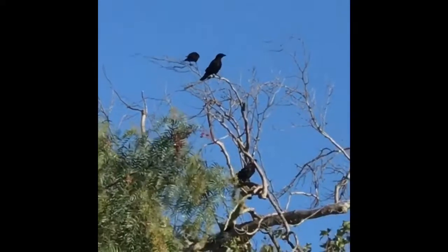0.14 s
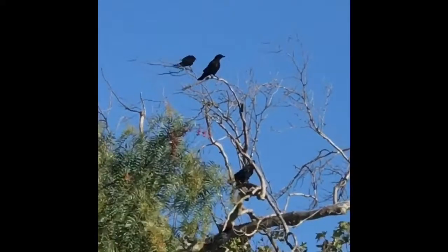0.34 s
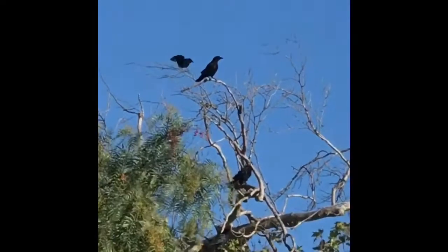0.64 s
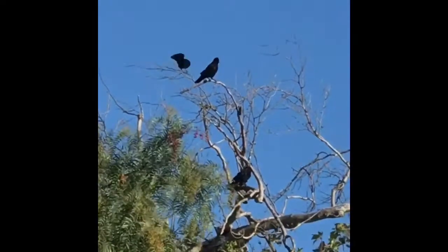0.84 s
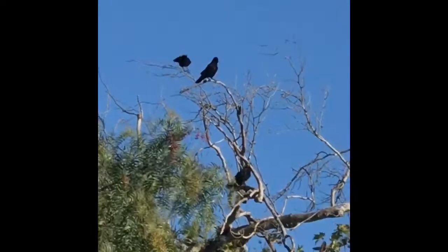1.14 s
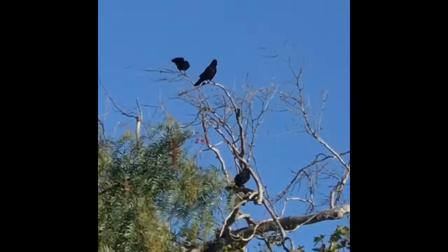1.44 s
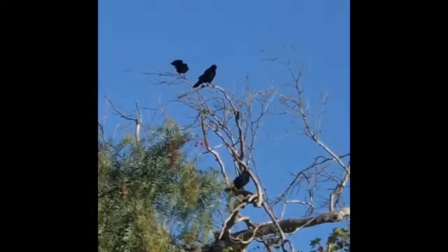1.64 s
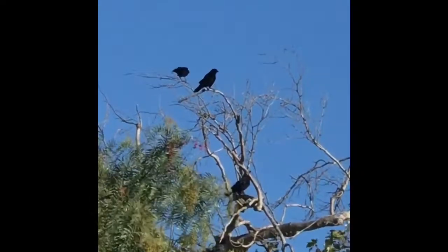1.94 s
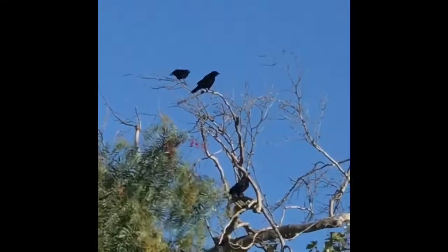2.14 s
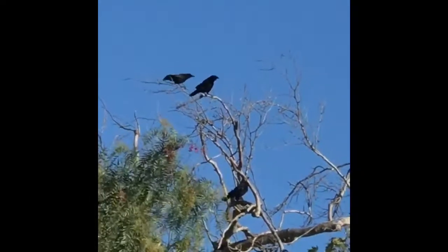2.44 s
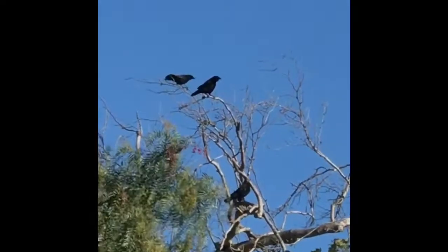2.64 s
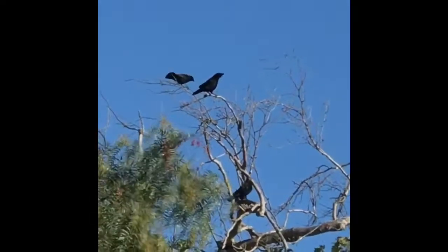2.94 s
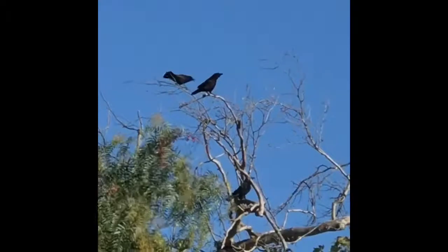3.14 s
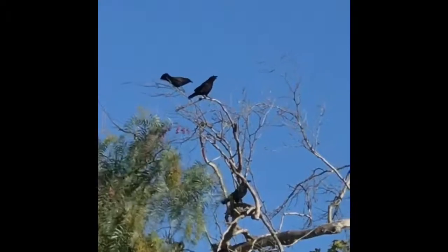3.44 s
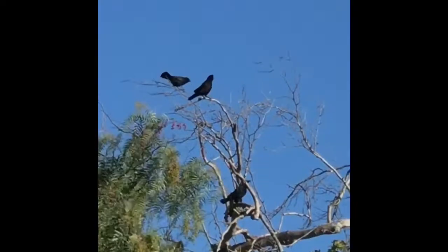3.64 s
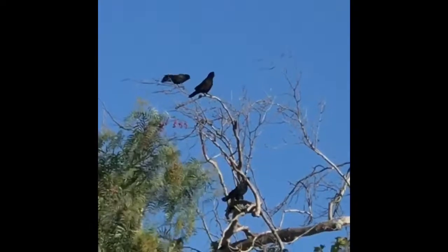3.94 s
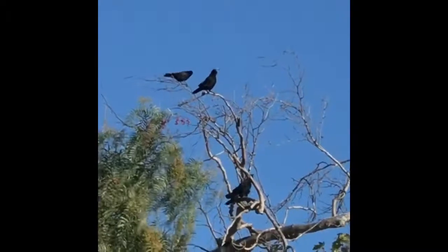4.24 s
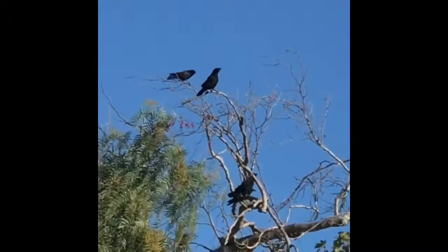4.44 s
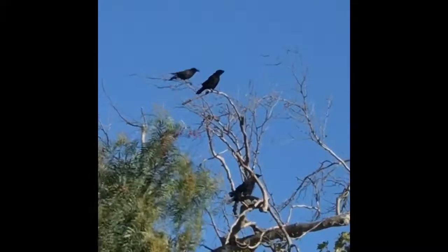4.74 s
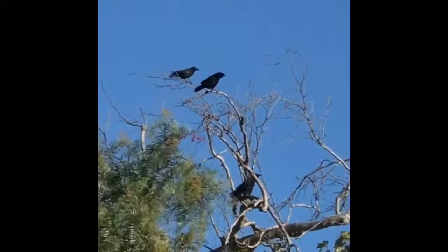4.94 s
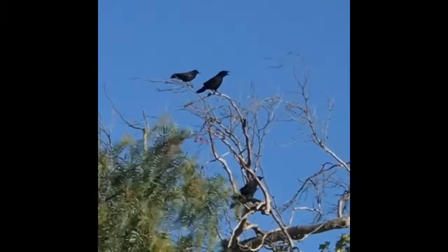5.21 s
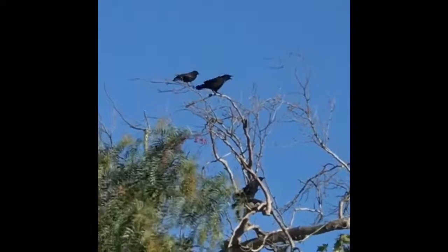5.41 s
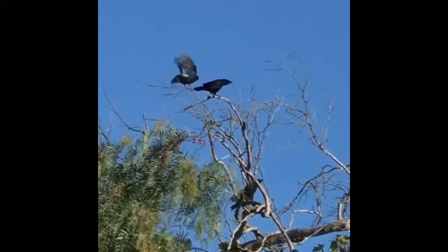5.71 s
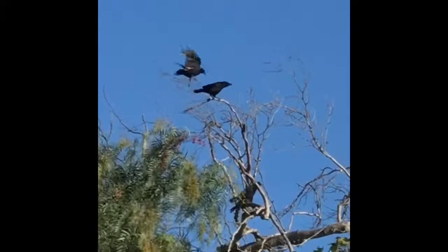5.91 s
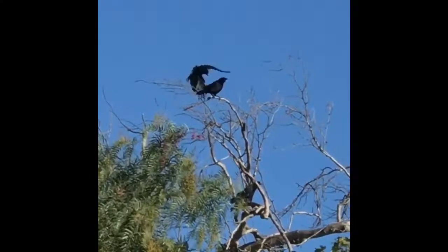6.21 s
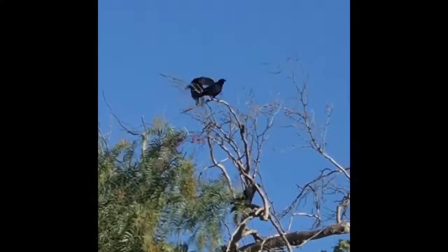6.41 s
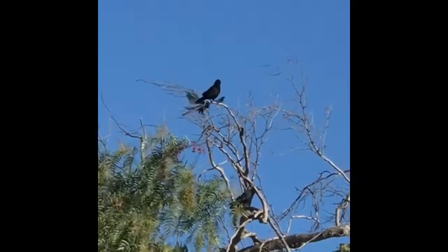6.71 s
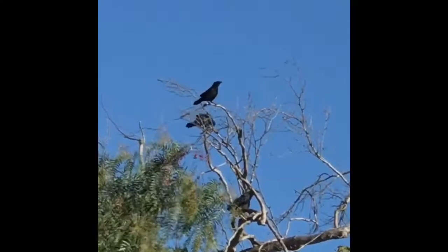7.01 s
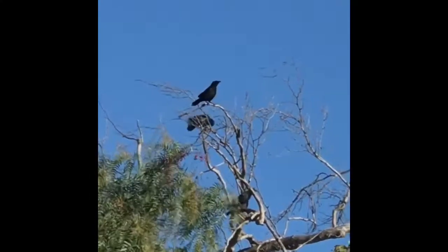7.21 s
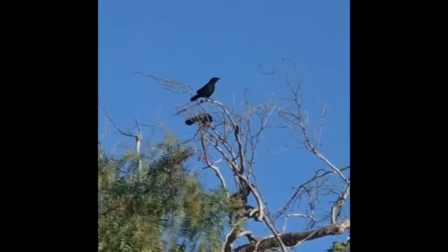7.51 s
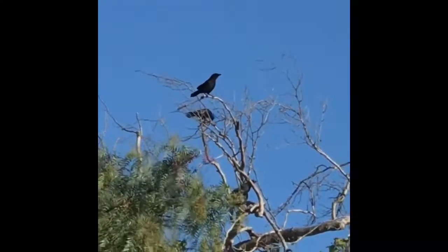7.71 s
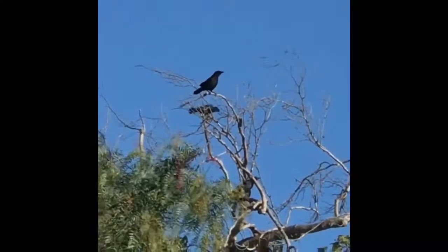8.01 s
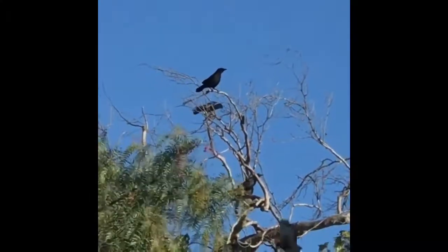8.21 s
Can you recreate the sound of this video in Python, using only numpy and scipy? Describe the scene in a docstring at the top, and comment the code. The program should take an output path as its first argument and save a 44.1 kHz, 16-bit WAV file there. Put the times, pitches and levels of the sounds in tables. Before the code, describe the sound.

Crows caw faintly, then closer and harsher, outdoors over a distant engine hum, with wind and bumps on the microphone later.

```python
"""Crows in a dead tree, over faint air and leaves. A far crow caws four times; twigs tick. A distant
engine drones, swelling to a growl at 3.2 s, while tyres pass far off. From 5.2 s a near crow answers
with arched caws: rasping syrinx pulses shaped by throat and beak. Wings swish at 5.8 s, then a second
crow rattles and drawls harsh calls across the caws. From 6.1 s wind and bumps reach the hand-held
microphone. At 7.3 s a small bird chips twice."""
import sys
import numpy as np
from scipy import signal
from scipy.fft import rfft, irfft, next_fast_len
from scipy.io import wavfile

SR = 44100
rng = np.random.default_rng(int(sys.argv[2]) if len(sys.argv) > 2 else 0)


def wrap_up_sound(samples):
    """Save the sound to the file named by the first command line argument, as 16-bit audio."""
    columns = np.atleast_2d(samples).T
    # keep every value between -1 and 1, then stretch to whole-number steps
    tamed = np.clip(columns, -1, 1)
    steps = np.round(tamed * 32767).astype(np.int16)
    wavfile.write(sys.argv[1], SR, steps)


N = 368676
TIME_S = np.arange(N) / SR

# Caws. Each row: start in seconds, length in seconds, top pitch in Hz, level in dB, rasp 0-1,
# treble shelf in dB.
NEAR_CAWS = [(5.204, .219, 645, -35.5, 0.63, 4.5), (5.508, 0.2058, 651, -36, 0.62, 2.5),
             (6.272, .23, 596.1, -37.5, 0.63, -15), (6.848, 0.21, 598.7, -37.5, 0.52, -12.5),
             (6.995, 0.2, 655.5, -38.5, 0.47, -18), (7.11, .22, 611, -40.5, .62, -3.5),
             (7.425, .225, 626.4, -36, 0.64, -2.5), (7.778, 0.2245, 640, -38.5, 0.35, -0.5),
             (8.168, 0.21, 644.6, -38, 0.32, -2)]
FAR_CAWS = [(.728, 0.22, 655.7, -55.5, 0.61, 0), (1.096, 0.215, 651, -55.5, .6, 0),
            (1.637, .208, 646, -54.5, 0.57, 0), (2.208, 0.2013, 646, -55, 0.59, 0)]
# Long calls. Each row: start in seconds, length in seconds, starting pitch in Hz, sag in Hz per second,
# level in dB, mid-call rasp 0-1.
DRAWLS = [(6.335, 0.306, 860, 700.6, -40, 0.79), (6.975, 0.31, 758.3, 200, -40, 0.82),
          (7.55, .29, 740, 438, -40.5, 0.68), (7.901, .1404, 786.2, 311, -49.5, 0.89),
          (8.291, 0.32, 798, 392, -48.5, .6)]
# Croak runs. Each row: start and end in seconds, croaks per second, starting level in dB, treble in dB.
RATTLES = [(5.985, 6.37, 16.8, -47.8, -1), (6.400, 6.84, 17.25, -54.5, 1)]
# Wing strokes. Each row: start and length in seconds, level in dB, centre in Hz, width in octaves.
WING_STROKES = [(5.823, 0.074, -62, 10740, 1), (5.868, 0.026, -53, 1769, 0.55),
                (5.888, 0.0333, -49, 1595, 0.46), (5.915, 0.0202, -49, 1800, 0.39)]
# Small bird. Each row: start in seconds, length in seconds, starting level in dB, pitch in Hz.
CHIPS = [(7.281, .04, -46, 8850), (7.466, .027, -51, 9050)]
# Twig ticks. Each row: start in seconds, level in dB, main mode in Hz, sharpness in dB.
TICKS = [(1.4942, -40.5, 2299, 0), (1.5368, -43.5, 1560, -7), (1.5475, -53, 2350, -8),
         (6.146, -47, 2300, -5)]
# Twig modes. Each row: ratio to the main mode, gain in dB, T60 in seconds.
TWIG_MODES = [(1, -1, .021), (1.48, -16, .02), (1.83, -16, .015), (2.83, -5, .012)]
# Microphone bumps. Each row: centre in seconds, thump in dB, scuff in dB.
BUMPS = [(6.387, -21, -27.5), (6.678, -9, -22), (6.772, -33.5, -33.5), (7.029, -23.5, -36.5),
         (7.499, -24, -41), (7.867, -24.5, -37.5)]
# Engine overtones. Each row: harmonic number, gain in dB, change on speeding up in dB.
OVERTONES = [(3, -2.5, 4.5), (5, -16, 2.5), (6, -18.5, -6.5)]
# Hum lines. Each row: frequency in Hz, level in dB.
HUM_LINES = [(118.6, -52), (237.2, -72)]
# Echo tail of the trees. Each row: frequency in Hz, T60 in seconds.
TREE_DECAY = [(300, 1), (1300, .72), (2000, .62), (3500, .43), (7000, .32), (14000, .13)]

# Level curves. Each row: time in seconds, base level in dB.
EXHAUST_LEVEL = [(0.2, -39.5), (0.7, -40), (1.7, -34.5), (2.8, -32), (4.05, -32), (4.9, -40.5),
                 (5.9, -38.5)]  # fundamental
DRONE_LEVEL = [(.1, -66), (.6, -84), (1.1, -64.5), (1.7, -69.5), (2, -62), (2.55, -54), (2.75, -56),
               (3.05, -50.5), (3.35, -52), (3.7, -55.5), (4, -68), (4.3, -70), (4.7, -61.5), (5.4, -70.5),
               (6, -67), (7.6, -71.5), (8.1, -57.5)]  # fourth harmonic
TYRE_LEVEL = [(.3, -68.5), (1.8, -62.5), (2.7, -71), (3.6, -58), (4.15, -65), (4.7, -61), (5.3, -63.5),
              (6, -81.5)]
LEAF_LEVEL = [(0, -65), (.45, -67), (.9, -76), (2.9, -89), (3.6, -71), (4.8, -68), (5.7, -63.5),
              (5.95, -60.5), (6.4, -61), (7.3, -60), (8.36, -60)]

# Spectra. Each row: frequency in Hz, relative gain in dB.
NEAR_THROAT = [(350, -19.5), (590, -9), (800, -17.5), (1000, -7), (1310, -6), (1600, 8.5), (1800, 3),
               (2080, 2), (2400, -3), (2750, -9), (3200, -0.5), (3650, -5.5), (4150, -9.5), (4550, -2.5),
               (4850, -12), (5150, -6.5), (5650, -14.5), (6500, 0), (7300, -12.5), (8000, -19),
               (15000, -44)]
FAR_THROAT = [(500, -6.5), (900, -34), (1300, -5.5), (1550, 3), (1750, -1.5), (1990, -0.5), (2250, -5.5),
              (2650, -14.5), (3200, -7), (4200, -13.5), (4500, -9), (4900, -13), (5300, -10.5),
              (6400, -6.5), (8000, -22), (14000, -35)]
SHUT_THROAT = [(500, -29.5), (1050, 3.5), (1420, -20), (1740, 7.5), (2400, -20.5), (6500, -9), (14000, -58)]  # beak nearly closed
DRAWL_THROAT = [(400, -42.5), (750, -19.5), (1080, 0), (1400, -1.5), (1600, 0.5), (1850, 0), (2600, -15),
                (3200, -9), (3650, -13), (4150, -13), (4500, -9.5), (4850, -20), (5500, -21.5),
                (7000, -16.5), (8200, -26), (15000, -50)]
RATTLE_THROAT = [(500, -20), (950, -18), (1150, -1.5), (1500, -20), (2150, -19), (2900, -37), (4400, -27),
                 (5600, -34), (7100, -19), (8000, -32), (12500, -41), (15000, -49.5)]
WIND_COLOUR = [(15, -10), (35, 5), (60, -2), (110, -14), (200, -31.5), (350, -47), (800, -75),
               (5000, -81.5)]
SCUFF_COLOUR = [(40, -31), (110, 12.5), (270, -6), (400, -24.5), (900, -58), (4000, -82.5)]
GROWL_COLOUR = [(100, -19), (260, 3), (400, 2.5), (560, -2.5), (800, -18), (2000, -42)]
ENGINE_RUSH_COLOUR = [(60, -15.5), (140, 5.5), (300, -1), (450, -13), (1100, -13), (2000, -27),
                      (5000, -74.5), (14000, -68)]
TYRE_COLOUR = [(150, -29), (600, 10.5), (790, 0), (1080, 5), (1700, -3), (2500, -11.5), (5000, -17),
               (8000, -38.5), (14000, -53)]
LEAF_COLOUR = [(500, 6.5), (2500, 1), (7000, -2.5), (9500, -7.5), (13000, -10.5), (15500, -38)]
AIR_COLOUR = [(12, -34), (20, -4), (59, 0.5), (87, -8), (106, -9), (185, -20.5), (245, -39), (439, -30.5),
              (788, -32.5), (1130, -33.5), (2090, -42.5), (2920, -39.5), (6360, -47), (12400, -57),
              (15500, -62)]
MIC_RESPONSE = [(11000, -0.5), (13000, 3.5), (15500, -6)]

# One push of breath per caw. peak, spread and shut_at are shares of its length; slack_pitch is a ratio.
NEAR_PUSH = dict(peak=.42, spread=.29, slack_pitch=.69, slack_db=-8, hoarse=.9,
                 attack_s=.028, open_s=.07, shut_at=.77, shut_db=-1, core_db=-3)
FAR_PUSH = dict(peak=.38, spread=.4, slack_pitch=.78, slack_db=-6, hoarse=.6,
                attack_s=.04, open_s=.0088, shut_at=.88, shut_db=-3, core_db=-16)
RASP_HZ = 72


def syrinx(hz, rasp, flutter=.065, jitter=.025, throb=.36, hiss=.16, smear=.23, scatter=.62):
    """Smeared pulses shaking at the rasp rate. Rasp frays the high harmonics most and adds air puffs."""
    size = len(hz)
    shake = 2 * np.pi * (np.cumsum(RASP_HZ * (1 + .12 * wander(size, 41.4))) / SR + rng.random())
    bend = rasp * (flutter * np.sin(shake) + jitter * wander(size, 231))
    phase = 2 * np.pi * np.cumsum(hz * (1 + bend)) / SR
    steps = np.arange(size) * 420 / SR  # 420 phase knots per second
    pulses = np.zeros(size)
    for k in range(1, 27):
        knots = rng.standard_normal(int(steps[-1]) + 2)
        fray = scatter * np.sqrt(k) * rasp * np.interp(steps, np.arange(len(knots)), knots)
        pulses += np.cos(k * phase + smear * k * k + fray) * (k * hz < SR / 2)
    puffs = (1 + np.cos(phase) / 2) * rng.standard_normal(size)
    air_share = np.clip(hiss * rasp ** 2, 0, 1)
    voice = np.sqrt(1 - air_share) * unit(pulses) + np.sqrt(air_share) * unit(puffs)
    return voice * (1 + np.clip(throb * rasp, 0, 1) * np.cos(shake))


def caws(rows, push, throat, beak_db, beak_from_hz, beak_to_hz, close_s=.09, release_s=.031):
    """Pitch and level sink and rasp grows as breath slackens. The beak opens, then shuts near the end."""
    out = np.zeros(N)
    for start_s, length_s, top_hz, db, rasp, treble_db in rows:
        t = np.arange(int(length_s * SR)) / SR
        progress = t / length_s
        slack = 1 - bell(progress, push["peak"], push["spread"])
        hz = top_hz * (1 - (1 - push["slack_pitch"]) * slack)
        drive = syrinx(hz, np.clip(rasp * (1 + push["hoarse"] * slack), 0, 1))
        # Open beak: its resonance climbs; at full effort the throat tunes to harmonic 2.
        beak_hz = beak_from_hz + (beak_to_hz - beak_from_hz) * progress
        beak = amp(beak_db) * resonate(drive, beak_hz, width_hz=170)
        core = amp(push["core_db"]) * resonate(drive, 2 * hz, width_hz=280) * (1 - slack) ** 2
        bright = unit(colour(drive, throat, treble_db) + core + beak)
        # Shut beak: a hollow ring climbs and throbs ever deeper.
        ring = amp(2.5) * resonate(drive, np.linspace(1290, 1470, len(t)), width_hz=200)
        ring *= 1 + .6 * progress * np.cos(2 * np.pi * RASP_HZ * t)
        muffled = unit(progress * colour(drive, SHUT_THROAT) + ring)
        muffled *= amp(push["shut_db"] + 4 * (progress - .5))
        shut = ramp(t - push["shut_at"] * length_s + close_s / 2, close_s)
        opening = ramp(t + push["open_s"] / 2, 2 * push["open_s"]) * (1 - shut)
        voice = opening * bright + (1 - opening) * muffled
        envelope = ramp(t, push["attack_s"]) * ramp(length_s - t, release_s)
        add(out, start_s, amp(db + push["slack_db"] * slack) * envelope * voice)
    return out


def drawls(attack_s=.0268, release_s=.0497):
    """Harsh calls that sag in pitch and clear midway. A narrow beak resonance climbs and grows."""
    out = np.zeros(N)
    for start_s, length_s, start_hz, sag_hz_per_s, db, mid_rasp in DRAWLS:
        t = np.arange(int(length_s * SR)) / SR
        hz = start_hz - sag_hz_per_s * t
        clear = bell(t / length_s, .5, .34)
        drive = syrinx(hz, 1 - (1 - mid_rasp) * clear, flutter=.09, jitter=.04, throb=.5, hiss=.3)
        beak_hz = np.linspace(3480, 3740, len(t))
        beak = amp(-6) * resonate(drive, beak_hz, width_hz=270) * np.sqrt(t / length_s)
        core = resonate(drive, 2 * hz, width_hz=340) * clear  # throat tuned to harmonic 2
        envelope = ramp(t, attack_s) * ramp(length_s - t, release_s)
        add(out, start_s, amp(db) * envelope * unit(colour(drive, DRAWL_THROAT) + core + beak))
    return out


def rattle(rise_s=.007, ring_db=-6.5, ring_t60_s=.3, swell_db_per_s=17.5, uneven_db=.6):
    """Swelling runs of dry croaks, about 17 a second, each leaving a hollow ring."""
    out, t = np.zeros(N), np.arange(SR // 8) / SR
    burst = (t / rise_s) ** 2 * np.exp(2 * (1 - t / rise_s))
    ring_envelope = amp(ring_db - 60 * t / ring_t60_s) * (1 - np.exp(-t / rise_s))
    for start_s, end_s, rate_hz, db, treble_db in RATTLES:
        for at_s in np.arange(start_s, end_s, 1 / rate_hz):
            croak = noise(len(t), RATTLE_THROAT, treble_db) * burst
            croak *= np.linalg.norm(burst) / np.linalg.norm(croak)  # equal push of air
            ring_hz = 1095 * (1 + .014 * rng.standard_normal())
            ring = np.sin(2 * np.pi * ring_hz * t) * ring_envelope
            croak_db = db + swell_db_per_s * (at_s - start_s) + uneven_db * rng.standard_normal()
            add(out, at_s, amp(croak_db) * (croak + ring))
    return out


def wings():
    """Feathers swish as a crow lifts off."""
    out = np.zeros(N)
    for start_s, length_s, db, hz, octaves in WING_STROKES:
        size = int(length_s * SR)
        band = [(hz / 4 ** octaves, -18), (hz, 0), (hz * 4 ** octaves, -18), (hz * 16 ** octaves, -40)]
        add(out, start_s, amp(db) * noise(size, band) * np.hanning(size))
    return out


def chips(scoop=.11, scoop_s=.00093, fade_db=8):
    """A small bird's thin whistles flick up to pitch."""
    out = np.zeros(N)
    for start_s, length_s, db, hz in CHIPS:
        t = np.arange(int(length_s * SR)) / SR
        pitch_hz = hz * (1 - scoop * np.exp(-t / scoop_s) + .0086 * wander(len(t), 400))
        whistle = np.sin(2 * np.pi * np.cumsum(pitch_hz) / SR) * signal.windows.tukey(len(t), .2)
        add(out, start_s, amp(db - fade_db * t / length_s) * whistle)
    return out


def twigs(snap_db=-6, snap_t60_s=.006):
    """Dead wood ticks: a snap, then the twig's modes."""
    out, t = np.zeros(N), np.arange(SR // 16) / SR
    for start_s, db, hz, sharp_db in TICKS:
        band = [(600, -8), (hz, 0), (3 * hz, -9), (6 * hz, -28)]
        snap = noise(len(t), band) * amp(snap_db + sharp_db - 60 * t / snap_t60_s)
        ring = sum(amp(mode_db + sharp_db * (ratio > 2) - 60 * t / t60_s)
                   * np.sin(2 * np.pi * hz * ratio * t) for ratio, mode_db, t60_s in TWIG_MODES)
        add(out, start_s, amp(db) * (snap + ring))
    return out


def wind(start_s=6.1, attack_s=.39, ease_db_per_s=1):
    """Lumpy wind on the microphone arrives, then slowly eases."""
    since_s = TIME_S - start_s
    db = -32.5 - ease_db_per_s * since_s + 2 * wander(N, 7.6)
    return amp(db) * ramp(since_s, attack_s) * noise(N, WIND_COLOUR)


def bumps(thump_hz=63, thump_s=.0093, scuff_s=.019):
    """Knocks on the microphone: a one-cycle thump and a short scuff."""
    out, t = np.zeros(N), np.arange(-SR // 20, SR // 20) / SR
    thump = np.sin(2 * np.pi * thump_hz * t) * bell(t, 0, thump_s)
    touch = bell(t, 0, scuff_s)
    for centre_s, thump_db, scuff_db in BUMPS:
        scuff = noise(len(t), SCUFF_COLOUR) * touch
        scuff *= np.linalg.norm(touch) / np.linalg.norm(scuff)
        add(out, centre_s + t[0], amp(thump_db) * thump + amp(scuff_db) * scuff)
    return out


def engine(firing_hz=79.75, swell_s=3.2, speed_up_s=5.5, speed_up_hz=1.4, waver_db=1.1):
    """A far exhaust note swells to a growl, then runs slightly faster, beside a fixed-pitch hum."""
    swell = bell(TIME_S, swell_s, .97)
    fast = ramp(TIME_S - speed_up_s, .823)
    phase = 2 * np.pi * np.cumsum(firing_hz + speed_up_hz * fast + .21 * wander(N, 4.1)) / SR
    out = amp(curve_db(EXHAUST_LEVEL) - 5 * fast) * np.sin(phase)
    out += amp(-68.5 + 15 * swell + 17 * fast + waver_db * wander(N, 3.8)) * np.sin(2 * phase)
    out += amp(curve_db(DRONE_LEVEL) + waver_db * wander(N, 2.28)) * np.sin(4 * phase)
    growl = noise(N, GROWL_COLOUR) * (1 + np.cos(phase))  # one puff per firing
    out += amp(-58) * bell(TIME_S, 3.21, .144) * growl
    for k, db, fast_db in OVERTONES:
        overtone_db = -64.5 + db + 14 * swell + fast_db * fast + waver_db * wander(N, 3.9)
        out += amp(overtone_db) * np.sin(k * phase + 2 * np.pi * rng.random())
    for hz, db in HUM_LINES:
        out += amp(db + waver_db * wander(N, 22)) * np.sin(2 * np.pi * hz * TIME_S)
    rush = amp(-57 + 6 * swell + 3 * fast) * noise(N, ENGINE_RUSH_COLOUR)
    return np.sqrt(2) * out + rush


def tyres(waver_db=1.85):
    """A far rush of tyres comes and goes."""
    return amp(curve_db(TYRE_LEVEL) + waver_db * wander(N, 6.5)) * noise(N, TYRE_COLOUR)


def leaves(stir_db=2):
    """Foliage fizzes in the breeze, loudest late on."""
    return amp(curve_db(LEAF_LEVEL) + stir_db * wander(N, 2.1)) * noise(N, LEAF_COLOUR)


def air(level_db=-44.5, waver_db=.5):
    """Distant rumble and faint hiss."""
    return amp(level_db + waver_db * wander(N, 11)) * noise(N, AIR_COLOUR)


def trees(x, early_db, tail_db, early_t60_s=.12):
    """Adds quick echoes off near trunks and ground, and a thin tail from farther off."""
    t = np.arange(SR) / SR
    early = rng.standard_normal(SR) * (rng.random(SR) < 400 / SR) * (t > .003)
    early = colour(early * amp(-60 * t / early_t60_s), [(2000, -4.5), (7000, -10)])
    late = rng.standard_normal(SR) * (rng.random(SR) < 2000 / SR) * (t > .025)
    hz, frame_s, bands = signal.stft(late, SR, nperseg=256)
    decay = amp(-60 * frame_s / at_hz(TREE_DECAY, hz)[:, None])
    tail = signal.istft(bands * decay, SR, nperseg=256)[1][:SR]
    echo = amp(early_db) * early + amp(tail_db) * unit(tail)
    return x + signal.fftconvolve(x, echo / np.sqrt(SR))[:N]


def amp(db):
    """dB to gain."""
    return 10 ** (np.asarray(db) / 20)


def unit(x):
    """Scales to rms 1."""
    return x / np.sqrt(np.mean(x ** 2) + 1e-20)


def ramp(t, length):
    """Smooth rise from 0 to 1, starting at t = 0."""
    return np.sin(np.pi / 2 * np.clip(t / length, 0, 1)) ** 2


def bell(t, centre, spread):
    """Gaussian hump of height 1."""
    return np.exp(-((t - centre) / spread) ** 2)


def at_hz(points, hz):
    """Interpolates on a log-frequency axis."""
    point_hz, value = np.transpose(points)
    return np.interp(np.log(hz + 1), np.log(point_hz + 1), value)


def curve_db(rows):
    """A level curve at every sample."""
    return np.interp(TIME_S, *np.transpose(rows))


def add(mix, start_s, sound):
    """Mixes a sound in at start_s."""
    part = mix[max(round(start_s * SR), 0):][:len(sound)]
    part += sound[:len(part)]


def wander(size, rate_hz):
    """Smooth random drift up to about rate_hz; rms 1."""
    white = rng.standard_normal(size + SR // 4)
    hz = np.fft.rfftfreq(len(white), 1 / SR)
    return unit(irfft(rfft(white) * np.exp(-(hz / rate_hz) ** 2))[:size])


def colour(x, points, treble_db=0):
    """Filters by a spectrum and a 4.2 kHz shelf; rms 1."""
    size = next_fast_len(len(x) + 2048, True)
    hz = np.fft.rfftfreq(size, 1 / SR)
    shelf_db = treble_db / (1 + (4200 / (hz + 1)) ** 4)
    return unit(irfft(rfft(x, size) * amp(at_hz(points, hz) + shelf_db), size)[:len(x)])


def noise(size, points, treble_db=0):
    """Coloured noise; rms 1."""
    return colour(rng.standard_normal(size), points, treble_db)


def resonate(x, hz, width_hz):
    """A resonance that follows the curve hz; rms 1."""
    carrier = np.exp(2j * np.pi * np.cumsum(hz) / SR)
    pole = np.exp(-np.pi * width_hz / SR)
    baseband = signal.lfilter([(1 - pole) ** 2], [1, -2 * pole, pole ** 2], x / carrier)
    return unit((carrier * baseband).real)


def scene():
    """Birds and twigs among the trees, over the background; mono."""
    near = caws(NEAR_CAWS, NEAR_PUSH, NEAR_THROAT, beak_db=-16.5, beak_from_hz=3400, beak_to_hz=3789)
    mix = trees(near + drawls(), early_db=-6, tail_db=-16.5)
    far = caws(FAR_CAWS, FAR_PUSH, FAR_THROAT, beak_db=-14, beak_from_hz=2989, beak_to_hz=4072)
    mix += trees(far, early_db=-2.5, tail_db=-5)
    mix += trees(rattle() + wings() + chips(), early_db=-8, tail_db=-18)
    mix += trees(twigs(), early_db=-14, tail_db=-22)
    return (mix + engine() + tyres() + air() + leaves() + wind() + bumps())[None]


def record(dry):
    """Microphone response, then the recorder's 15.72 kHz band limit."""
    response = amp(at_hz(MIC_RESPONSE, np.fft.rfftfreq(2 * N, 1 / SR)))
    picked_up = irfft(rfft(dry, 2 * N) * response)[:, :N]
    lowpass = signal.firwin(511, 15720, window=("kaiser", 9), fs=SR)
    return signal.oaconvolve(picked_up, lowpass[None], "same")


dry = scene()
out = record(dry)
wrap_up_sound(out)
```